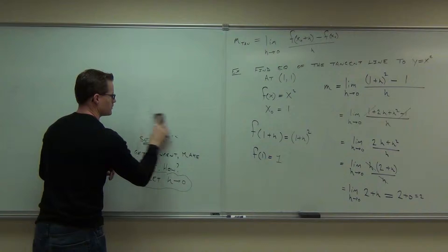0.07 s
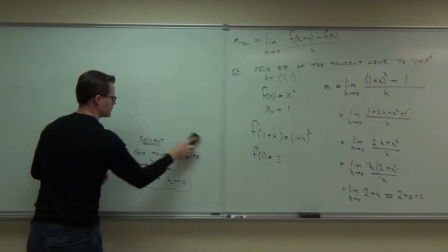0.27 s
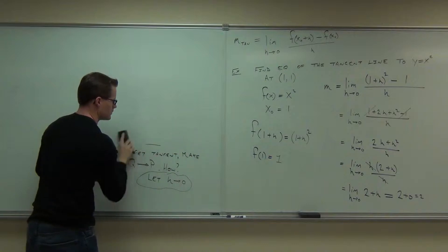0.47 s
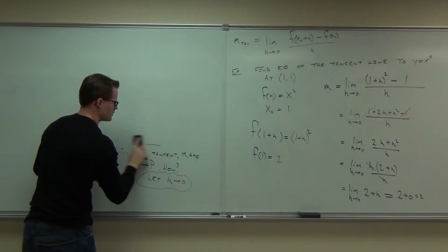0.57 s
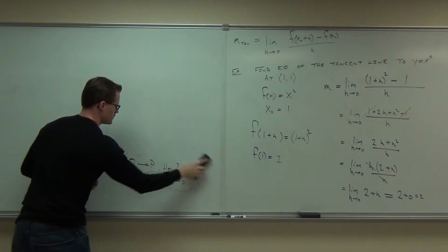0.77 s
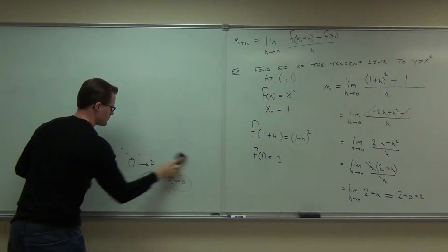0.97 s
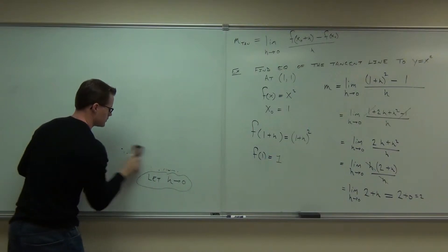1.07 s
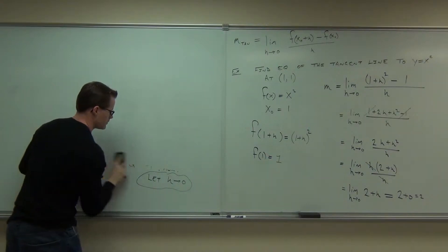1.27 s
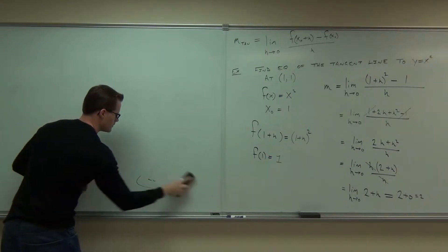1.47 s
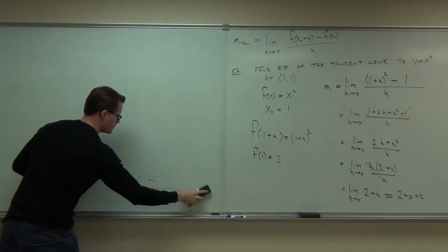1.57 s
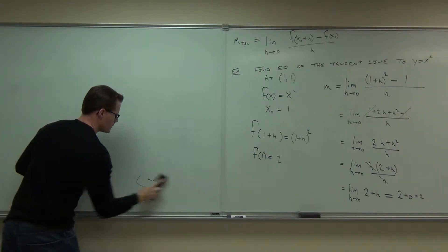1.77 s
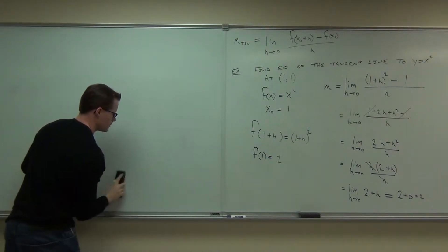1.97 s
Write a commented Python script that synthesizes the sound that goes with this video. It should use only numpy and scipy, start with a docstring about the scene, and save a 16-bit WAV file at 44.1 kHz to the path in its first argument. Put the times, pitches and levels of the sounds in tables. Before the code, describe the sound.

Felt eraser scrubbing a whiteboard in bright hissing strokes, soft board knocks, a late rattle

```python
"""A bright hiss fades in and swells stroke by stroke: a felt eraser sweeps a classroom whiteboard.
Friction is shaped noise, under which the board murmurs; ventilation is low noise with narrow hums.
Knocks and low thumps are decaying sines, ticks are noise bursts. Near the end, on the left, something
hard, perhaps a chair, snaps twice and rattles: impulses excite a set of resonances.
Knocks, ticks and rattle also reverberate in the room."""
import sys
import numpy as np
from scipy import signal
from scipy.io import wavfile
from scipy.ndimage import uniform_filter1d

SR = 44100
rng = np.random.default_rng(int(sys.argv[2]) if len(sys.argv) > 2 else 0)


def unload_wav(signal):
    """Save mono or channel-first audio to the path in sys.argv[1] as 16-bit WAV at rate SR, clipped to [-1, 1]."""
    wavfile.write(
        sys.argv[1],
        SR,
        np.round(np.clip(np.atleast_2d(signal).T, -1, 1) * 32767).astype(np.int16),
    )


N = 89170

# Ventilation and room air, relative spectral density: [f/Hz, level/dB per Hz]
AIR_SPECTRUM = [(15, -41), (25, 0), (45, 0), (130, 0), (211, 1), (414, -10), (790, -15.5), (904, -9),
                (1010, -17), (1640, -20.5), (4000, -18.5), (10000, -21), (13000, -21.5), (15800, -28)]
# Wavering hums: [f/Hz, resonator width/Hz, level/dB]
HUMS = [(56, 6.9, -55.5), (209, 12, -59.5), (907, 21, -69)]
# Wandering level of the strongest hum: [t/s, level/dB]
HUM_SWELL = [(0.07, -52.5), (0.128, -50.5), (0.222, -59.5), (0.542, -48), (0.72, -61.5), (0.982, -46.5),
             (1.438, -52), (1.46, -49), (1.976, -60), (2.02, -49)]
# Likeness of left and right noise: [f/Hz, correlation/0-1]
STEREO_LIKENESS = [(60, 1), (250, .985), (500, .94), (1000, .85), (2500, .8), (8000, .845)]
# Left level over right level in the noise: [f/Hz, level/dB]
LEFT_OVER_RIGHT = [(200, 0), (500, 1), (1200, 2), (4000, 1.5), (12000, 2)]
# Low thumps of the panel: [t/s, level/dB before the rise and decay, f/Hz]
THUMPS = [(0.901, -33.5, 143), (1.411, -35, 301), (1.668, -33, 131), (1.762, -34, 234.6)]
# Dull knocks of the board: [t/s, level/dB added to each mode]
KNOCKS = [(.277, -39.5), (.7545, -32), (.765, -28), (.778, -42), (1.275, -42), (1.645, -36.5)]
# Modes of the board: [f/Hz, relative level/dB, 60 dB decay time/s]
BOARD_MODES = [(448, -9.5, .05), (587, 0, 0.051), (659, -8.5, 0.084), (1050, -16, .025), (2020, -10, 0.036),
               (2150, -23, 0.037)]
# Sharp ticks: [t/s, level/dB at the start, upper band limit f/Hz]
TICKS = [(.064, -43.5, 3500), (.264, -58, 4000), (1.204, -37.5, 10000)]
# Force of the rattle: [t/s, level/dB, gain of the drive to the upper modes/dB]
RATTLE_FORCE = [(1.925, -50, 0), (1.936, -47, -3), (1.95, -38.5, 12), (1.958, -33.5, 1), (1.967, -34, 4),
                (1.975, -36, -5), (1.982, -33.5, 16), (1.991, -41.5, -4), (2.0, -47, 0), (2.008, -34.5, 4),
                (2.02, -37, -3)]
# Resonances of what rattles: [f/Hz, width/Hz, level/dB]
FRAME_MODES = [(680, 37, 11.5), (938, 92, 11), (1104, 62, 6), (1315, 70, 10.5), (1680, 69, -4),
               (1930, 140, -1), (2240, 26, -12), (2720, 60, -28), (2940, 51, -25), (3430, 15, -25)]
# Single snaps about the onset of the rattle: [t/s, level/dB at the start]
SNAPS = [(1.893, -28.5), (1.9294, -32)]
# Low scrub of the board under the pressing hand: [t/s, level/dB]
PRESS = [(.07, -56), (.24, -58.5), (.55, -53.5), (.63, -50), (.7, -49.5), (.83, -48.5), (.9, -52),
         (1.0, -50), (1.15, -55.5), (1.3, -44.5), (1.37, -47.5), (1.44, -47), (1.6, -53.5), (1.88, -55)]
# Relative spectral density of the scrub: [f/Hz, level/dB per Hz]
SCRUB_SPECTRUM = [(150, -10), (350, 3.5), (700, 2.5), (1200, -2), (2200, -6), (3500, -10), (6000, -25)]
# Felt speed as hiss level, and its brightness: [t/s, level/dB before tilt, tilt/dB per octave]
STROKES = [(0.07, -44, -1.5), (0.118, -43, 3), (0.286, -45, -2), (0.33, -42, 2), (0.552, -47.5, -4),
           (0.586, -43.5, -1.5), (0.748, -41, 1), (0.852, -42.5, -2.5), (0.884, -49.5, -4),
           (0.938, -40.5, 0.5), (1.036, -40.5, 1.5), (1.248, -48, -6), (1.274, -44.5, 0),
           (1.454, -36.5, -2), (1.6, -41, -3), (1.644, -49, -3.5), (1.698, -40.5, 0), (1.84, -38, 0.5),
           (1.964, -46, -4.5), (2.02, -48, -2)]
# Relative spectral density of the felt hiss before tilt: [f/Hz, level/dB per Hz]
FELT_SPECTRUM = [(880, -6), (1500, -22.5), (1940, -8), (2160, -11.5), (3200, -8.5), (4060, -12.5),
                 (5040, -4.5), (11400, 2.5), (13500, 0), (15800, -9)]

AIR_DB, HUM_HZ, HUM_WIDTH_HZ = -45, 117.3, 8
THUMP_RISE_S, THUMP_T60_S = 0.01, 0.12
TICK_T60_S = 0.035
SLIPS_PER_S, SLIP_SPREAD_DB = 1500, 2
RATTLE_BAND_HZ, UPPER_HZ, RATTLE_LEFT_DB = [350, 3000], 1500, 3
SNAP_RING_DB, SNAP_T60_S = -4.5, 0.026
PIVOT_HZ = 9000
ROOM_T60_S, ROOM_DB, BOARD_ROOM_DB = 0.41, -8, -6.5
START_S, FADE_S, EDGE_HZ = 0.033, 0.032, 15880


def amp(db):
    """Level definition: amplitude ratio from decibels."""
    return 10 ** (np.asarray(db) / 20)


def evened(x):
    """Normalization: scale to unit root-mean-square amplitude."""
    return x / np.sqrt(np.mean(x ** 2) + 1e-20)


def read(points, hz):
    """Interpolation of a spectrum on a logarithmic frequency axis."""
    f, value = np.transpose(points)
    return np.interp(np.log(hz + 1), np.log(f + 1), value)


def curve(points, t, column=1):
    """Linear interpolation of one table column in time."""
    rows = np.transpose(points)
    return np.interp(t, rows[0], rows[column])


def add(mix, s, sound):
    """Superposition: add a sound at time s, cut at the end of the mix."""
    part = mix[round(s * SR):][:len(sound)]
    part += sound[:len(part)]


def resonate(x, hz, width):
    """Resonance: shift hz to zero, low-pass, and shift back, with unit peak gain."""
    turn = np.exp(2j * np.pi * hz * np.arange(len(x)) / SR)
    r = np.exp(-np.pi * width / SR)
    return 2 * (turn * signal.lfilter([1 - r], [1, -r], x / turn)).real


def noise(field, size, patchy_db, flicker_db):
    """Spectral synthesis: random stereo bins follow a dB field, with patches and shared flicker."""
    hop = size // 4
    frames, hz = N // hop + 5, np.fft.rfftfreq(size, 1 / SR)[:, None]
    a, b, c, d, patches = rng.standard_normal((frames, len(hz), 5)).T
    patches = uniform_filter1d(patches, size=8, axis=0)
    patches = evened(uniform_filter1d(patches, size=10, axis=1))
    flicker = evened(uniform_filter1d(rng.standard_normal(frames), size=4))
    # The right channel mixes the left with independent noise
    same = np.clip(read(STEREO_LIKENESS, hz), 0, 1)
    left = a + 1j * b
    right = same * left + np.sqrt(1 - same ** 2) * (c + 1j * d)
    lean = amp(read(LEFT_OVER_RIGHT, hz) / 2)
    z = np.array([left * lean, right / lean])
    t = np.arange(frames) * hop / SR
    z *= amp(field(hz, t) + patchy_db * patches + flicker_db * flicker)
    return evened(signal.istft(z, nperseg=size, noverlap=size - hop)[1][:, :N])


def hum(hz, width, db):
    """Narrow-band beating: a steady tone wavers against twice-resonated noise."""
    fuzz = evened(resonate(resonate(rng.standard_normal(N), hz, width), hz, width))
    tone = 1.5 * np.sin(2 * np.pi * hz * np.arange(N) / SR)
    return amp(db) * evened(tone + fuzz)


def air():
    """Broadband ventilation noise with superposed tones: a low wash and wavering hums."""
    wash = noise(lambda hz, t: read(AIR_SPECTRUM, hz) + 0 * t, size=2048, patchy_db=0.04, flicker_db=1.05)
    hums = sum(hum(*row) for row in HUMS)
    strongest = hum(HUM_HZ, HUM_WIDTH_HZ, curve(HUM_SWELL, np.arange(N) / SR))
    return amp(AIR_DB) * wash + hums + strongest


def room(x):
    """Reverberation: sparse random-sign taps decay exponentially, partly shared by the ears."""
    t = np.arange(SR // 2) / SR
    taps = rng.choice([-1., 1.], (2, len(t))) * (rng.random((2, len(t))) < 2000 / SR)
    taps = taps * amp(-60 * t / ROOM_T60_S) * (t > .004)
    taps[1] = .6 * taps[0] + .8 * taps[1]
    taps = signal.lfilter([.4], [1, -.6], taps)  # dulls the reflections
    return signal.fftconvolve(x[None], taps / np.linalg.norm(taps[0]), axes=1)[:, :N]


def thumps():
    """Damped oscillation of the panel: one softly started sine per thump."""
    out, t = np.zeros(N), np.arange(8000) / SR
    for s, db, hz in THUMPS:
        swing = np.minimum(t / THUMP_RISE_S, 1) * np.sin(2 * np.pi * hz * t)
        add(out, s, amp(db - 60 * t / THUMP_T60_S) * swing)
    return out


def knocks():
    """Modal excitation: soft blows set off the board's damped modes at random phases."""
    out, t = np.zeros(N), np.arange(6000) / SR
    phases = rng.random((len(KNOCKS), len(BOARD_MODES)))
    for (s, db), phase in zip(KNOCKS, phases):
        ring = sum(amp(level - 60 * t / t60) * np.sin(2 * np.pi * (hz * t + p))
                   for (hz, level, t60), p in zip(BOARD_MODES, phase))
        add(out, s, amp(db) * np.minimum(t / 0.0032, 1) * ring)  # 3.2 ms rise
    return out


def ticks():
    """Impulsive noise: each brief crack is band-limited and decays exponentially."""
    out, t = np.zeros(N), np.arange(2000) / SR
    for (s, db, top_hz), crack in zip(TICKS, rng.standard_normal((len(TICKS), len(t)))):
        band = signal.butter(2, [600, top_hz], "bandpass", fs=SR)
        add(out, s, amp(db - 60 * t / TICK_T60_S) * evened(signal.lfilter(*band, crack)))
    return out


def frame(x, upper):
    """Modal response: parallel resonances plus some direct drive, band-limited."""
    band = signal.butter(3, RATTLE_BAND_HZ, "bandpass", fs=SR, output="sos")
    modes = sum(amp(db) * resonate(x * (upper if hz > UPPER_HZ else 1), hz, width)
                for hz, width, db in FRAME_MODES)
    return signal.sosfilt(band, amp(-7.5) * x + modes)


def snap_force():
    """Impulsive force: a short pulse and decaying noise for each snap."""
    out, t = np.zeros(N), np.arange(1500) / SR
    for (s, db), crack in zip(SNAPS, rng.standard_normal((len(SNAPS), len(t)))):
        add(out, s, amp(db - 60 * t / SNAP_T60_S) * (0.34 * crack + 1.62 * (t < .00012)))
    return out


def rattle():
    """Stick-slip excitation: uneven slips and two snaps ring a hollow frame."""
    t = np.arange(N) / SR
    sizes = amp(SLIP_SPREAD_DB * np.minimum(rng.exponential(1, N), 3))
    slips = sizes * (rng.random(N) < SLIPS_PER_S / SR) * rng.choice([-1, 1], N)
    force = amp(curve(RATTLE_FORCE, t)) * (t > RATTLE_FORCE[0][0])
    upper = amp(curve(RATTLE_FORCE, t, column=2))
    rung = frame(slips * force, upper) / np.std(frame(slips, 1))
    snaps = snap_force()
    crisp = signal.lfilter(*signal.butter(2, [600, 4200], "bandpass", fs=SR), snaps)
    # Scaled by the frame's response to unit white noise
    snap_ring = frame(snaps, 1) / np.std(frame(rng.standard_normal(N), 1))
    return rung + crisp + amp(SNAP_RING_DB) * snap_ring


def scrub():
    """Friction-driven vibration: the pressed board murmurs as patchy midrange noise."""
    rub = noise(lambda hz, t: read(SCRUB_SPECTRUM, hz) + 0 * t, size=512, patchy_db=3.67, flicker_db=1.4)
    return amp(curve(PRESS, np.arange(N) / SR)) * rub


def felt():
    """Sliding friction: fine hiss follows the stroke speed and dulls where the stroke turns."""
    def field(hz, t):
        tilt = np.log2((hz + 500) / PIVOT_HZ) * curve(STROKES, t, column=2)
        return read(FELT_SPECTRUM, hz) + tilt - 40 * (hz < 1200)  # little hiss in the lows
    hiss = noise(field, size=256, patchy_db=1.0, flicker_db=0.26)
    return amp(curve(STROKES, np.arange(N) / SR)) * hiss


def scene():
    """Superposition of all direct sounds and the reverberation of the hits."""
    board, side = knocks() + ticks(), rattle()
    hits = board * amp([[.8], [-.8]]) + side * amp([[RATTLE_LEFT_DB], [-RATTLE_LEFT_DB]])
    echoes = amp(ROOM_DB) * room(amp(BOARD_ROOM_DB) * board + side)
    return air() + echoes + thumps() + hits + scrub() + felt()


def record(dry):
    """Band limitation: a cubic fade-in, then a linear-phase low-pass."""
    faded = dry * np.clip((np.arange(N) / SR - START_S) / FADE_S, 0, 1) ** 3
    lowpass = signal.firwin(1023, EDGE_HZ, window=("kaiser", 11), fs=SR)
    return signal.oaconvolve(faded, lowpass[None], "same")


dry = scene()
out = record(dry)
unload_wav(out)
```